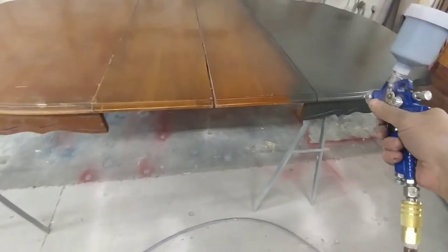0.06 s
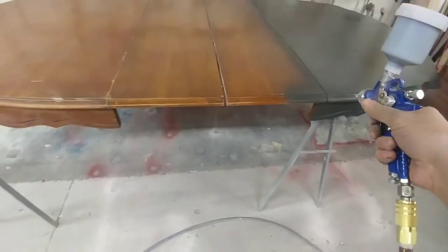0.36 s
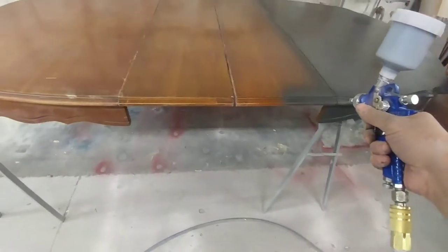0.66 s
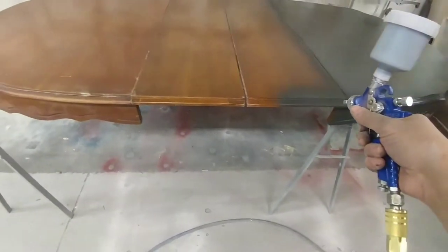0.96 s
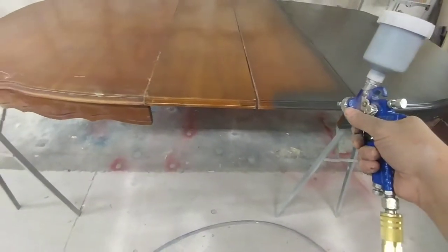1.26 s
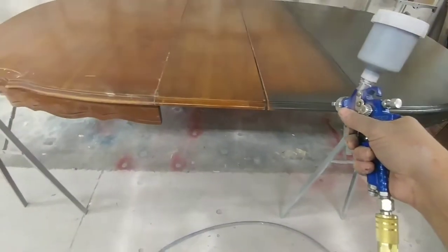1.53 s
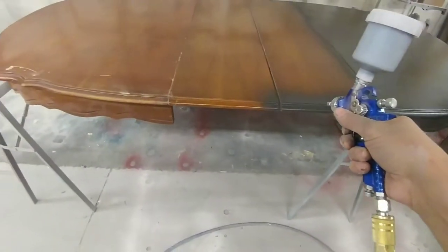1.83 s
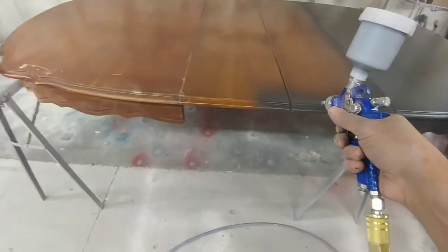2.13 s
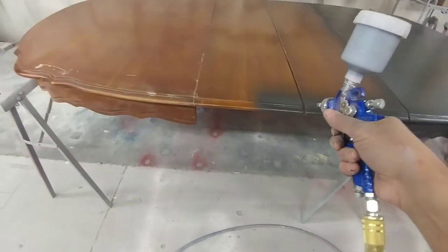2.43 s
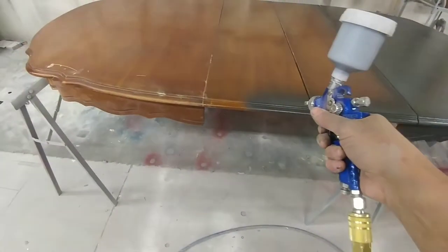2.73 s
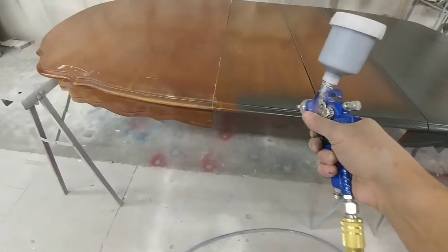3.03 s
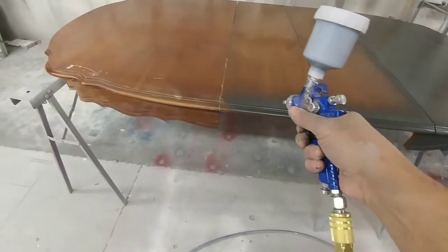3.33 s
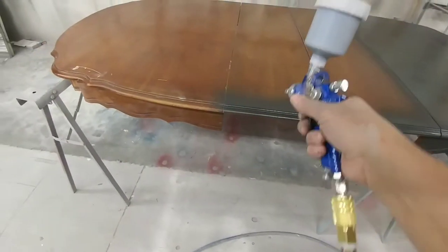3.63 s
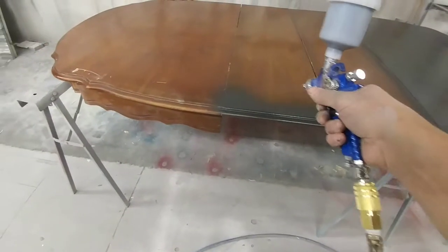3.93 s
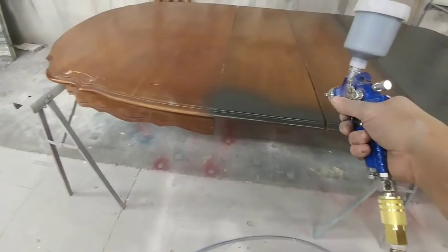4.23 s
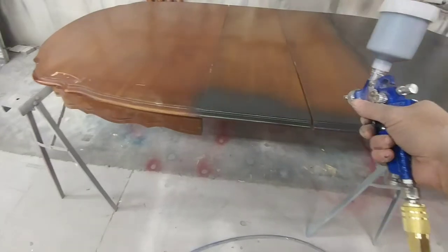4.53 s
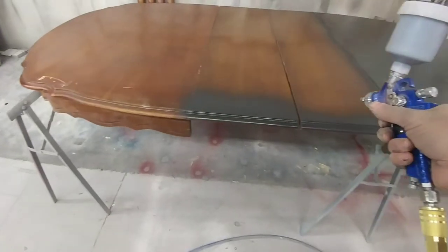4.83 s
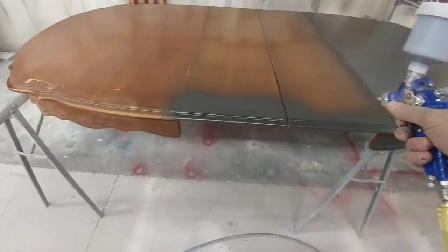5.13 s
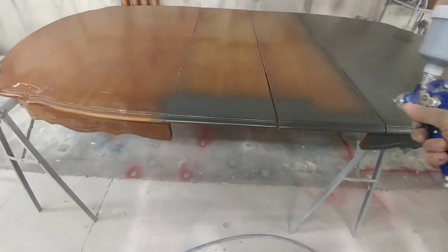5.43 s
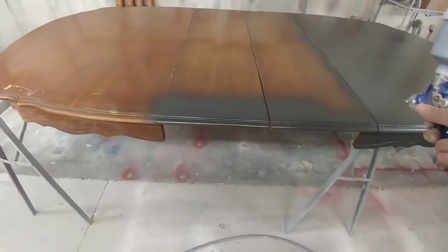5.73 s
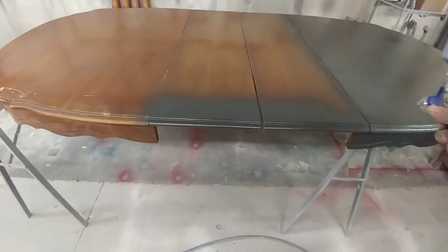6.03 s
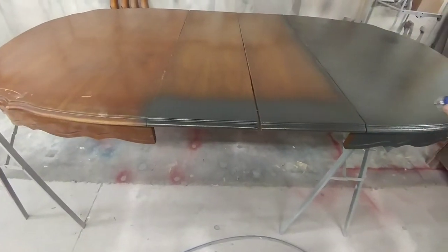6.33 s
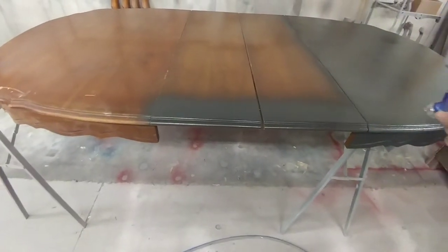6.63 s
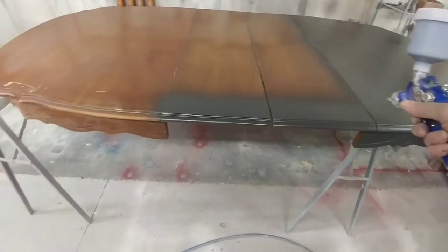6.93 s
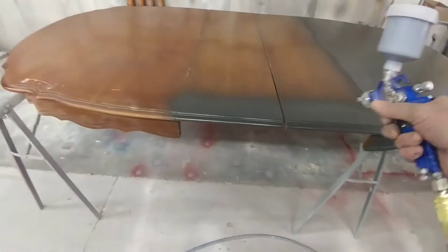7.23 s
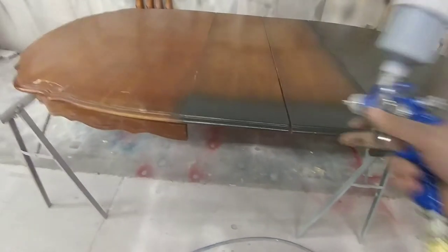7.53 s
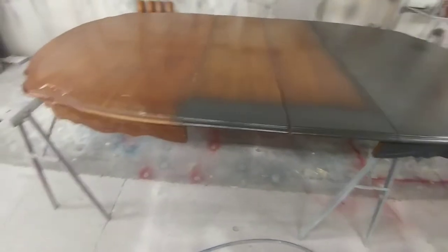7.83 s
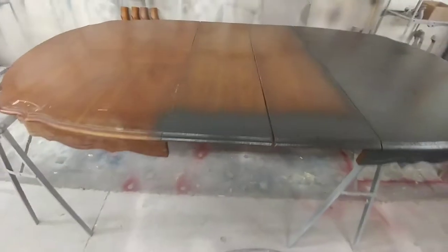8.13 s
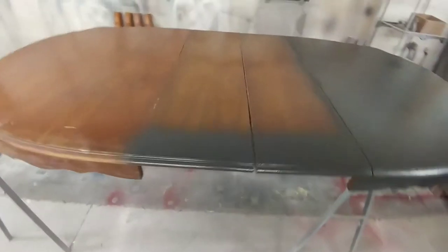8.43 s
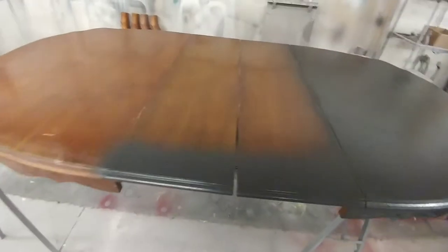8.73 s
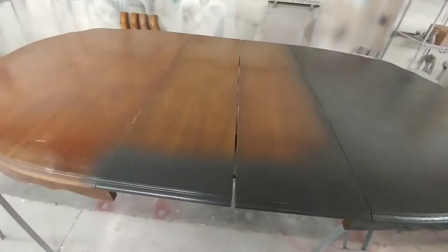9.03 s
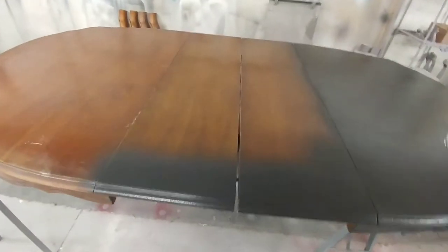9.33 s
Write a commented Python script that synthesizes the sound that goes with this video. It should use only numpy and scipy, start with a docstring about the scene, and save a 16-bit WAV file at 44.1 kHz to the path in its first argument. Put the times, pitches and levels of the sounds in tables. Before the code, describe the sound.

An air spray gun paints a wooden table top with a loud, steady hiss and a softer rushing roar underneath. It is close by, just to the right, drifting slightly as it sweeps, and the workshop walls reflect the sound. Late on, the trigger is released for about a second: the air drains away, leaving a faint squeak and soft handling bumps and scuffs. Then the hiss snaps back on.

```python
"""A loud, steady hiss from just right of the listener: an air spray gun painting a wooden table top.
The nozzle jet hisses and the paint fan roars as the gun sweeps to and fro; the table and the
workshop walls reflect the hiss. The trigger is let go for about a second: the last air drains,
the valve squeaks faintly, and soft handling bumps and scuffs are bared. Then it is pulled again."""
import sys
import numpy as np
from scipy import signal
from scipy.fft import rfft, irfft, next_fast_len
from scipy.io import wavfile
from scipy.ndimage import uniform_filter1d, map_coordinates

SR = 44100
rng = np.random.default_rng(int(sys.argv[2]) if len(sys.argv) > 2 else 0)


def dump(signal):
    """Clip the signal to [-1, 1] and save it as 16-bit WAV at the path in sys.argv[1]."""
    limited = np.clip(np.atleast_2d(signal).T, -1, 1)
    pcm = np.round(limited * 32767).astype(np.int16)
    wavfile.write(sys.argv[1], SR, pcm)


N = 418068

# Trigger pulls. Each row: air valve opens in seconds, shuts in seconds, air level in dB.
TRIGGER_PULLS = [(-1, 7.695, -7.8), (8.602, 10, -7.4)]
# Gun position. Each row: time in seconds, lag of the left channel in ms (more is further right).
GUN_SWEEP = [(0, .225), (2, .16), (3.7, .045), (4.5, .15), (5.5, .235), (6.6, .31), (7.1, .26), (7.6, .17),
             (8.6, .37), (9.2, .32), (9.48, .315)]
# Hollow resonance of fan and scuffs. Each row: frequency in Hz, density in dB.
HOLLOW_SPECTRUM = [(380, -41.5), (465, -9), (510, -9), (550, -3.5), (590, 0), (650, -2.3), (695, -9),
                   (740, -7.5), (775, -3.5), (820, -11), (885, -26), (945, -7), (1020, -33), (1200, -40)]
BLEED_DB_PER_S = 150  # decay of the air left in the gun


def nozzle_jet(table_db=-11, far_right_ms=.3, room_t60_s=.195, darken_db_per_db=.28):
    """Turbulent air hisses from the moving nozzle: direct path, table scatter and diffuse wall sound."""
    # Each row: frequency in Hz, density in dB.
    jet_spectrum = [(300, -33), (1400, -21), (2350, -15.6), (2800, -11.2), (4200, -7.6), (5600, -5.3),
                    (6600, -1.3), (7200, .3), (7900, -3.3), (8450, -8.7), (9050, -16.3), (9600, -10.7),
                    (14700, -11), (15600, -15)]
    # Each row: frequency in Hz, direct share of the power before the path gains.
    direct_shares = [(1000, 0.76), (2500, 0.34), (3600, 0.37), (5000, .36), (7000, 0.47), (8200, 0.33),
                     (9200, .2), (11000, 0.245), (14000, 0.26)]
    # Each row: frequency in Hz, left-right correlation of the wall sound.
    wall_correlation = [(2100, .3), (2600, .05), (3200, -.25), (3600, -.18), (4100, .18), (5200, .1),
                        (6500, 0), (8500, 0), (9200, -.3), (9900, 0)]
    # Each row: frequency in Hz, left minus right in dB.
    balance = [(1000, 1), (2500, 0), (5000, 1.4), (6700, 0), (7400, 3.4), (8100, 5.5), (9000, 2.3),
               (11500, .8), (15000, .3)]
    # Colour along the sweep. Each row: time in seconds, then gains in dB for
    # top left, top right, 7 kHz peak left, lower band.
    band_gains = [(0, 4.6, 1.5, -2.6, -1.3), (.4, 3.8, .8, -.8, -1), (1.1, 3.1, 0, -.6, -.3),
                  (1.9, .8, -.2, -.3, .9), (2.15, 0, -.4, -.4, .2), (2.6, .9, 0, -.7, -.3),
                  (3.1, -.1, 0, .8, .5), (3.5, 2, .1, .4, 0), (4.15, .3, -.3, .3, -.2),
                  (4.6, 2.2, -.1, .1, .5), (4.95, 1, 0, -.2, .4), (5.4, 2.4, 1, -.1, 0),
                  (5.9, 0, .7, .2, -.1), (6.6, -.2, 1.2, .2, -.4), (7.15, 1, 1.2, .5, .3),
                  (7.6, -1.2, -.8, .6, .4), (8.7, -.4, .3, -.1, -.7), (9.08, 1.9, 2.2, -.1, -.9),
                  (9.48, -.4, .7, 0, -.5)]
    flow = airflow()
    lag_ms, = curves(GUN_SWEEP, clock())
    left_top_db, right_top_db, peak_db, lower_db = curves(band_gains, clock())
    near = (lag_ms / far_right_ms) ** 2  # swung right, the gun is closer and gains on the room
    source = flow * noise(jet_spectrum, channels=2)
    jet, scatter = filtered(source, lambda hz: np.sqrt(along(direct_shares, hz)))
    direct = amp(-1 + 1.6 * near) * np.array([delayed(jet, lag_ms), jet])
    # The table lies nearer the middle: half the lag.
    table = amp(table_db + 3 * near) * np.array([delayed(scatter, .5 * lag_ms), scatter])
    # Diffuse hiss with narrow random peaks and dips that slowly come and go.
    field = patchy(noise(jet_spectrum, channels=2), depth_db=2.1)
    walls = lingering(flow, room_t60_s) * blended(field, wall_correlation)
    diffuse = amp(-2 * near) * filtered(walls, lambda hz: np.sqrt(1 - along(direct_shares, hz)))
    hiss = filtered(direct + table + diffuse, lambda hz: pan_gains(along(balance, hz)))
    # A weak jet loses its top treble first.
    top_db = darken_db_per_db * 20 * np.log10(flow / flow.max()) + np.array([left_top_db, right_top_db])
    hiss = shaded(hiss, lo_hz=8800, hi_hz=SR, change_db=top_db)
    left, right = shaded(hiss, lo_hz=100, hi_hz=4600, change_db=lower_db)
    return np.array([shaded(left, lo_hz=5600, hi_hz=8400, change_db=peak_db), right])


def airflow(start_db=-2.5, settle_s=.06, shut_db_per_s=430, bleed_db=-11.5, leak_db=-63.5):
    """Jet strength: snaps on a little weak, reaches full pressure, drains to a faint leak."""
    flow = amp(leak_db)
    for opens, shuts, air_db in TRIGGER_PULLS:
        settle_db = start_db * np.exp(-np.maximum(clock() - opens, 0) / settle_s)
        bleed = amp(bleed_db) * gate(opens, shuts, BLEED_DB_PER_S)
        valve = np.maximum(gate(opens, shuts, shut_db_per_s), bleed)
        flow = np.hypot(flow, amp(air_db + settle_db) * valve)
    return flow


def atomised(air, dry_db=-5.5, flutter_db=.8, flutter_hz=20):
    """Dry air sounds thin; paint fills out the lower hiss, which flutters with the uneven feed."""
    paint = spraying()
    change_db = dry_db * (1 - paint) + flutter_db * paint * wobble(flutter_hz)
    return shaded(air, lo_hz=100, hi_hz=4600, change_db=change_db)


def paint_fan(core_db=-39, gust_db=1.2, near_pan_db=-6, rest_pan_db=1.5):
    """The fan rushes, rings and buffets; the hollow ring fades as the gun swings right, baring its core."""
    # Each row of both: frequency in Hz, density in dB.
    roar_spectrum = [(110, -38), (180, -15), (230, -5), (295, 1.5), (365, -5.5), (450, -1.5), (650, -2),
                     (780, -1.5), (960, -3.5), (1110, -3), (1220, -12.5), (1380, -11), (1470, -8),
                     (2100, -13), (3000, -35.5)]
    buffet_spectrum = [(13, -47), (22, -17.5), (32, -19.5), (86, 2.5), (124, 1), (156, -6), (190, -1.5),
                       (250, -32), (420, -120)]
    # Each row: time in seconds, then relative levels in dB for rush, ring, low band of the rush.
    fan_levels = [(0, -30.1, -26.5, -0.0), (0.7, -30.1, -26.4, -0.1), (1.9, -29.1, -26.3, -0.7),
                  (2.6, -30.1, -25.9, 0.5), (3.35, -28.6, -25.9, -1.0), (4.2, -29.8, -26.4, -0.5),
                  (5, -30.2, -26.8, 0.0), (5.6, -31.0, -28.0, -1.1), (6.1, -31.6, -28.8, -0.7),
                  (6.8, -31.6, -29.6, -0.3), (7.4, -29.7, -28.3, -0.9), (8.15, -32, -31, 0),
                  (8.65, -34.5, -36, 1), (8.9, -33.6, -32, 2.0), (9.48, -33.0, -30.9, 2.7)]
    # Each row: time in seconds, buffet level in dB while paint flows.
    buffet_levels = [(0, -39), (3.5, -38.5), (3.85, -46), (4.35, -46), (4.85, -42.5), (5.4, -46.5),
                     (6.5, -48), (6.8, -43), (7.55, -42), (8.7, -48), (9.48, -51)]
    lag_ms, = curves(GUN_SWEEP, clock())
    rush_db, ring_db, low_db = curves(fan_levels, clock())
    buffet_db, = curves(buffet_levels, clock())
    # The full fan is close on the right; its faint ring in the pause comes from all round.
    pan_db = rest_pan_db + spraying() * (near_pan_db - rest_pan_db)
    roar = shaded(pair(roar_spectrum, alike=.96, pan_db=pan_db), lo_hz=150, hi_hz=470, change_db=low_db)
    rush = amp(rush_db + 1.5) * turbulence(dry_db=-13.8, fall_db_per_s=22) * roar
    ring = amp(ring_db - .7) * pair(HOLLOW_SPECTRUM, alike=.94, pan_db=pan_db)
    core = amp(core_db) * pan_gains(pan_db) * singing(hz=590, width_hz=36)
    left, right = rush + turbulence(dry_db=-9.5, fall_db_per_s=18) * (ring + core)
    gusts = amp(buffet_db + gust_db * wobble(8.3)) * turbulence(dry_db=-6, fall_db_per_s=4)
    buffet = gusts * pair(buffet_spectrum, alike=.84, pan_db=pan_db)
    return np.array([delayed(left, .44 * lag_ms), right]) + buffet


def turbulence(dry_db, fall_db_per_s, trickle_s=.45):
    """Fan strength: full with paint, weaker on dry air, fading as the last air trickles out."""
    strength = 0
    for opens, shuts, _ in TRIGGER_PULLS:
        trickle = gate(opens, shuts + trickle_s, BLEED_DB_PER_S)
        dry_air = amp(dry_db) * gate(opens, shuts, fall_db_per_s) * trickle
        strength = strength + np.maximum(needle(opens, shuts), dry_air)
    return strength


def needle(opens_s, shuts_s, lag_s=.038, lead_s=.028, lift_s=.045, seat_s=.06):
    """Paint needle opening, 0 to 1: lifts after the air starts, seats before it stops."""
    lifting = (clock() - opens_s - lag_s) / lift_s
    seating = (shuts_s - lead_s - clock()) / seat_s
    return np.clip(np.minimum(lifting, seating), 0, 1) ** 2


def spraying():
    """Paint flow over all pulls, 0 to 1."""
    return sum(needle(opens, shuts) for opens, shuts, _ in TRIGGER_PULLS)


def drain(level_db=-32, fall_db_per_s=55, lasts_s=.15, end_db_per_s=115, sputter_db=1.5, sputter_hz=30):
    """After the valve shuts, trapped air sputters out, lower in pitch than the jet."""
    # Each row: frequency in Hz, density in dB.
    drain_spectrum = [(500, -30), (900, -9), (1300, -4), (1650, -1), (2200, 2), (2900, -1), (4000, -1),
                      (5500, 0), (7000, -10), (10000, -45)]
    envelope = sum(gate(shuts, shuts, fall_db_per_s) * gate(shuts, shuts + lasts_s, end_db_per_s)
                   for _, shuts, _ in TRIGGER_PULLS)
    return amp(level_db + sputter_db * wobble(sputter_hz)) * envelope * noise(drain_spectrum, channels=2)


def bumps(gain_db=-6, attack_s=.0007, click_t60_s=.012):
    """Dull knocks of hand and hose: a soft click, then low, damped modes."""
    # Each row: start in seconds, relative level in dB, factor on the modes' t60, click over ring in dB.
    knocks = [(7.880, -19, .2, 6), (7.887, -18, .55, -1), (7.894, -26, .5, -5), (7.904, -29, .8, -2),
              (7.939, -33, .9, -6), (8.474, -30, .3, 6), (8.507, -38, .6, -8), (8.548, -38, .7, -8),
              (8.581, -38, .6, -6)]
    # Each row: frequency in Hz, level in dB, base t60 in seconds.
    body_modes = [(110, -13, .2), (165, -6.5, .13), (220, -3.5, .11), (290, -6, .08), (382, -7, .07),
                  (574, -4, .09), (714, -11, .06), (910, -17, .05)]
    out = np.zeros(N)
    t = np.arange(SR // 2) / SR
    dull = noise([(100, -6), (600, 0), (950, -3), (1500, -30), (4000, -60)])[0]
    for start_s, db, length, click_db in knocks:
        start = round(start_s * SR)
        ring = sum(amp(mode_db - 60 * t / (t60_s * length)) * np.sin(2 * np.pi * (hz * t + rng.random()))
                   for hz, mode_db, t60_s in body_modes)
        click = amp(click_db - 60 * t / click_t60_s) * dull[start:][:len(t)]
        out[start:][:len(t)] += amp(db + gain_db) * (ring + click) * (1 - np.exp(-t / attack_s))
    return out


def thuds(rise_s=.013):
    """Hand and hose shift: soft pushes of a few very low cycles."""
    # Each row: start in seconds, envelope peak in dB, pitch in Hz.
    pushes = [(7.695, -37.5, 57), (7.95, -45, 58), (8.03, -47, 70), (8.15, -46, 57), (8.4, -49, 80),
              (8.475, -43, 62), (8.505, -42, 80), (8.548, -41, 57), (8.565, -46, 100), (8.63, -45, 62)]
    out = np.zeros(N)
    t = np.arange(SR // 4) / SR
    envelope = t / rise_s * np.exp(1 - t / rise_s)
    for start_s, db, hz in pushes:
        out[round(start_s * SR):][:len(t)] += amp(db) * envelope * np.sin(2 * np.pi * hz * t)
    return out


def scuffs(grain_db=2.5, grain_hz=240, room_db=-5):
    """Scuffs and the trigger's tick: swells of grainy friction with a hollow body and a sibilant peak."""
    # Each row: peak time in seconds, level in dB, rise and fall in seconds,
    # relative sibilance in dB, hollow body in dB.
    rubs = [(8.04, -55, .022, .03, -7, 0), (8.122, -44.5, .011, 0.015, 7, 0),
            (8.383, -51, 0.016, 0.02, 0, -2), (8.43, -56.5, .03, .04, -12, 7),
            (8.565, -54, .05, .025, -10, 7), (8.581, -48, .001, 0.002, 2, -6)]
    # Each row: frequency in Hz, density in dB.
    friction_spectrum = [(400, -25), (1200, -2), (3000, -1), (7000, 0.5), (8900, -11.5), (12000, -15),
                         (15000, -25)]
    t = clock()
    friction = noise(friction_spectrum)[0] * amp(grain_db * wobble(grain_hz))
    hollow = noise(HOLLOW_SPECTRUM)[0]
    sibilance = noise([(3000, -42), (5500, -9), (7000, 3.5), (7800, -2), (8800, -22), (14000, -30)])[0]
    out = np.zeros(N)
    for peak_s, db, rise_s, fall_s, bright_db, hollow_db in rubs:
        away = np.minimum(np.maximum((peak_s - t) / rise_s, (t - peak_s) / fall_s), 20)
        swell = np.exp(1 - np.hypot(away, 1))  # rounded top
        out += amp(db) * swell * unit(friction + amp(hollow_db) * hollow + amp(bright_db - 2) * sibilance)
    return out * pan_gains(3) + amp(room_db) * room(out)


def valve_squeak(peak_s=7.955, rise_s=.06, fall_s=.075, level_db=-56):
    """Air leaking through the shut valve's narrow gap sings in one fuzzy resonance."""
    since_s = clock() - peak_s
    swell = np.exp(-np.maximum(-since_s / rise_s, since_s / fall_s) ** 2)
    return amp(level_db) * swell * singing(hz=2280, width_hz=170)


def room(x):
    """Diffuse stereo reflections off the walls; the top treble dies first."""
    # Each row: frequency in Hz, t60 in seconds.
    wall_decay = [(300, 0.12), (3000, 0.31), (8000, 0.23), (15000, 0.05)]
    hz, t, bins = signal.stft(rng.standard_normal((2, SR // 2)), SR, nperseg=256)
    tail = signal.istft(bins * amp(-60 * t / along(wall_decay, hz)[:, None]), SR, nperseg=256)[1]
    tail /= np.linalg.norm(tail, axis=1, keepdims=True)
    return signal.fftconvolve(x[None], tail, axes=1)[:, :N]


def lingering(level, t60_s):
    """Level of the diffuse field, building up and dying away behind its source."""
    pole = 10 ** (-6 / (t60_s * SR))
    power = level ** 2
    return np.sqrt(signal.lfilter([1 - pole], [1, -pole], power, zi=[pole * power[0]])[0])


def workshop(level_db=-53.5):
    """The quiet workshop's steady low rumble."""
    # Each row: frequency in Hz, density in dB.
    shop_spectrum = [(15, -44.5), (25, -11), (48, 3), (70, 7), (115, 0), (170, -12), (621, -3), (691, -11),
                     (770, -8), (860, -17), (1070, -13), (1390, -24), (2240, -18.5), (4040, -24.5),
                     (6720, -29.5), (15000, -41.5)]
    return amp(level_db) * pair(shop_spectrum, alike=.76, pan_db=4)


def amp(db):
    """Decibels to gain."""
    return np.exp(np.maximum(db, -300) * np.log(10) / 20)


def pan_gains(pan_db):
    """Two channel gains, left minus right by pan_db."""
    return amp(np.outer([.5, -.5], pan_db))


def unit(x):
    """Scale to rms 1."""
    return x / np.sqrt(np.mean(x ** 2) + 1e-20)


def clock():
    """Sample times in seconds."""
    return np.arange(N) / SR


def along(points, hz):
    """(Hz, value) points read on a log axis."""
    knots_hz, values = np.transpose(points)
    return np.interp(np.log(hz + 1), np.log(knots_hz), values)


def curves(rows, t):
    """Each column after the time, read at times t."""
    times_s, *columns = np.transpose(rows)
    return [np.interp(t, times_s, column) for column in columns]


def gate(opens_s, shuts_s, fall_db_per_s, rise_s=.009):
    """Valve envelope: quick rise, hold, steady fall in dB."""
    t = clock()
    return np.clip((t - opens_s) / rise_s, 0, 1) * amp(-fall_db_per_s * np.maximum(t - shuts_s, 0))


def wobble(rate_hz):
    """Smooth random curve, rate_hz knots a second."""
    return map_coordinates(rng.standard_normal(int(N * rate_hz / SR) + 4), [clock() * rate_hz])


def filtered(x, response):
    """Apply a gain given as a function of Hz."""
    size = next_fast_len(N + SR // 2)
    return irfft(rfft(x, size) * response(np.fft.rfftfreq(size, 1 / SR)), size)[..., :N]


def shaded(x, lo_hz, hi_hz, change_db):
    """Turn one band up or down by a curve."""
    band = filtered(x, lambda hz: 1 / (1 + (lo_hz / (hz + 1)) ** 16) / (1 + (hz / hi_hz) ** 16))
    return x + (amp(change_db) - 1) * band


def delayed(x, lag_ms):
    """Path with a time-varying delay."""
    oversampled = signal.resample_poly(x, 2, 1)
    return map_coordinates(oversampled, [2 * SR * (clock() - lag_ms / 1e3)], order=3)


def noise(spectrum, channels=1):
    """Noise of rms 1, coloured by (Hz, dB) points."""
    return unit(filtered(rng.standard_normal((channels, N)), lambda hz: amp(along(spectrum, hz))))


def singing(hz, width_hz):
    """Noise of rms 1 in a single resonance."""
    return unit(filtered(rng.standard_normal(N), lambda f: 1 / (1 + ((f - hz) / width_hz) ** 2)))


def pair(spectrum, alike, pan_db):
    """Panned stereo noise; alike is the share of power common to both sides."""
    stereo = np.sqrt(alike) * noise(spectrum) + np.sqrt(1 - alike) * noise(spectrum, channels=2)
    return stereo * pan_gains(pan_db)


def blended(x, correlation):
    """Mix two unrelated noises to a given correlation at each frequency."""
    mid, side = filtered(x, lambda hz: np.sqrt((1 + np.outer([1, -1], along(correlation, hz))) / 2))
    return np.array([mid + side, mid - side])


def patchy(x, depth_db):
    """Narrow random peaks and dips that slowly come and go."""
    bins = signal.stft(x, nperseg=1024)[2]
    patches = uniform_filter1d(rng.standard_normal(bins.shape), size=2, axis=1)
    patches = uniform_filter1d(uniform_filter1d(patches, size=30, axis=2), size=12, axis=2)
    return unit(signal.istft(bins * amp(depth_db * unit(patches)), nperseg=1024)[1][:, :N])


def scene():
    """Gun, handling and workshop, in stereo."""
    background = workshop()
    gun = atomised(nozzle_jet()) + drain() + paint_fan() + valve_squeak()
    handling = bumps() + thuds() + scuffs()
    return gun + handling + background


def record(dry, ceiling=1.05, hardness=7, top_hz=15500):
    """Round off the loudest peaks, then low-pass steeply."""
    rounded = dry / (1 + np.abs(dry / ceiling) ** hardness) ** (1 / hardness)
    return filtered(rounded, lambda hz: 1 / (1 + (hz / top_hz) ** 400))


dry = scene()
out = record(dry)
dump(out)
```